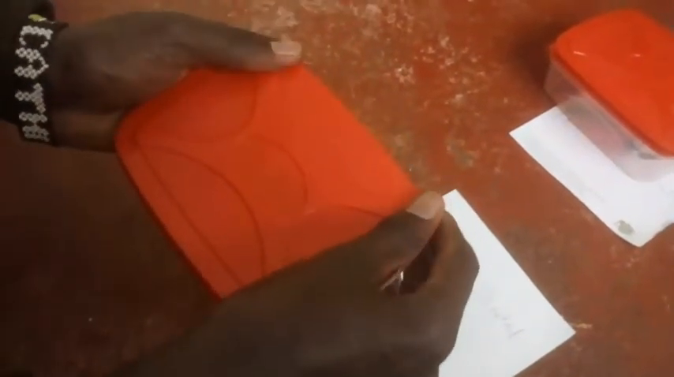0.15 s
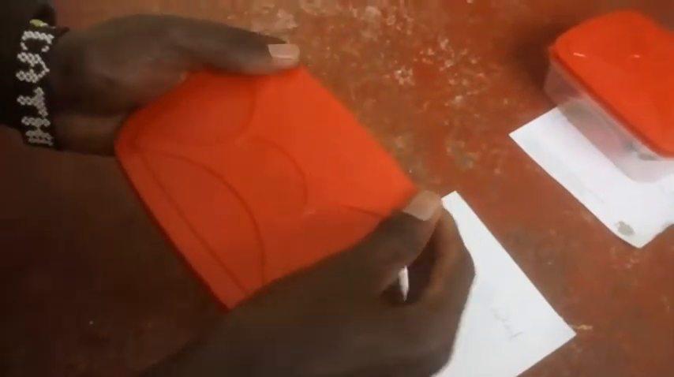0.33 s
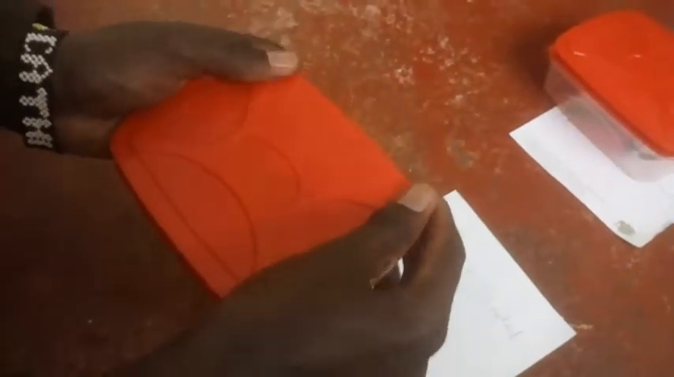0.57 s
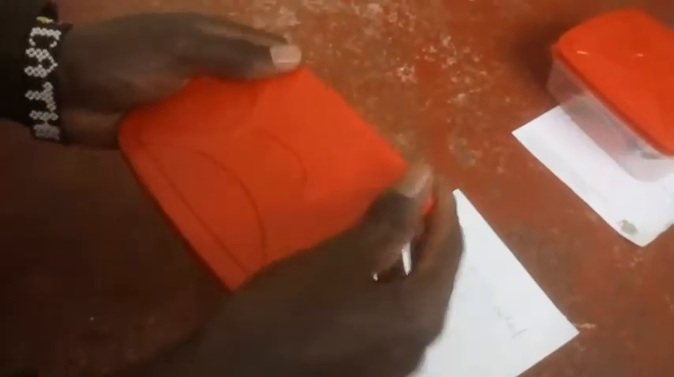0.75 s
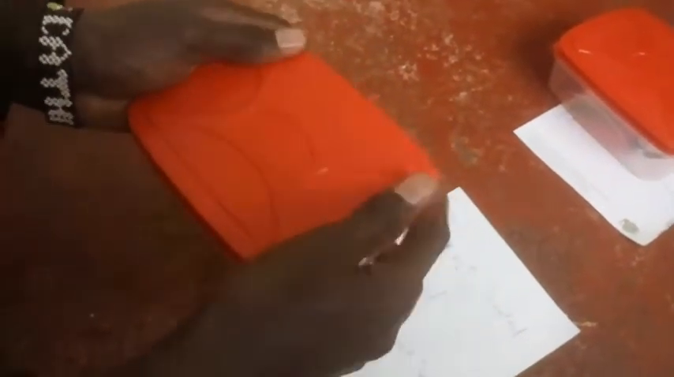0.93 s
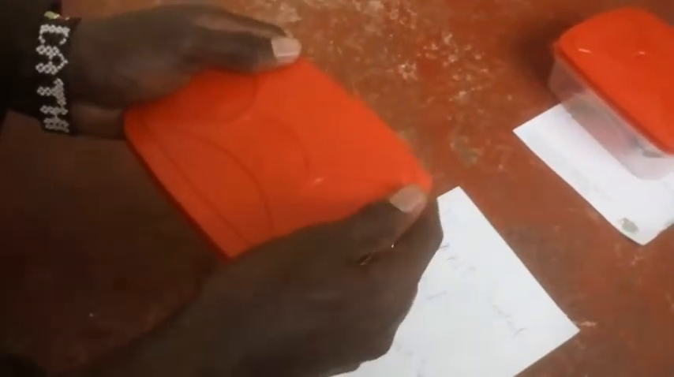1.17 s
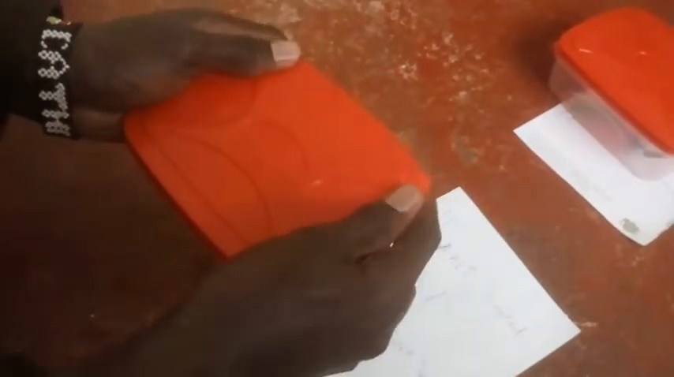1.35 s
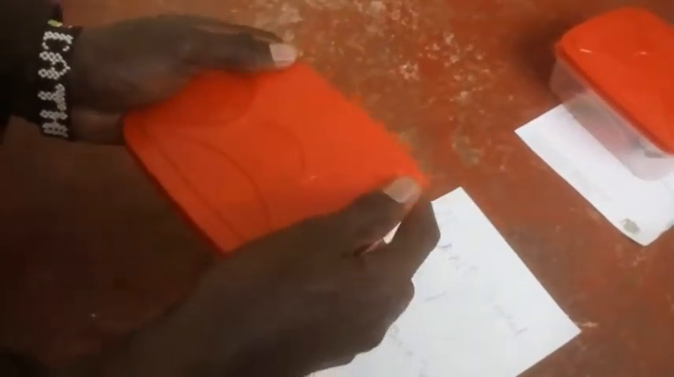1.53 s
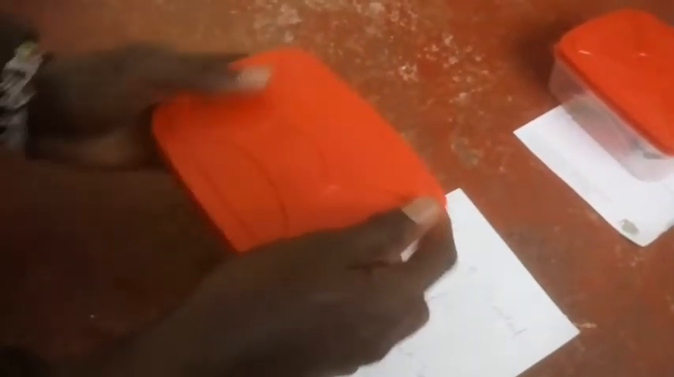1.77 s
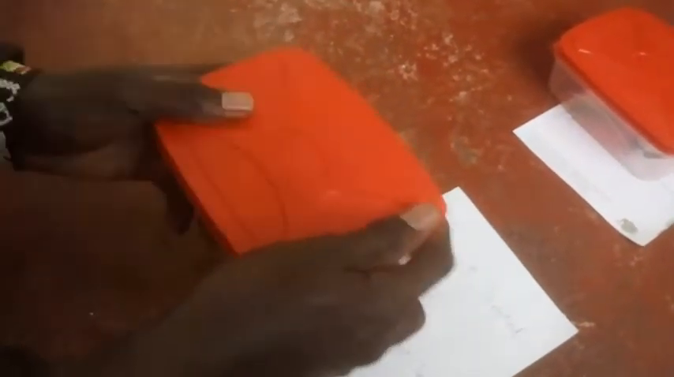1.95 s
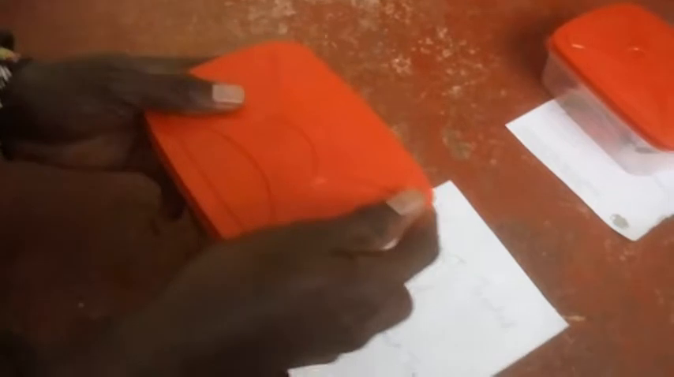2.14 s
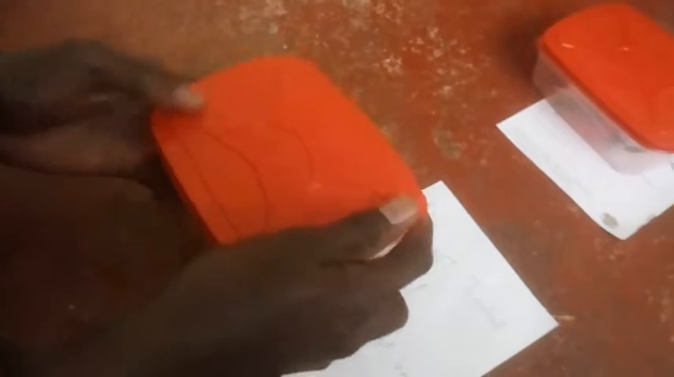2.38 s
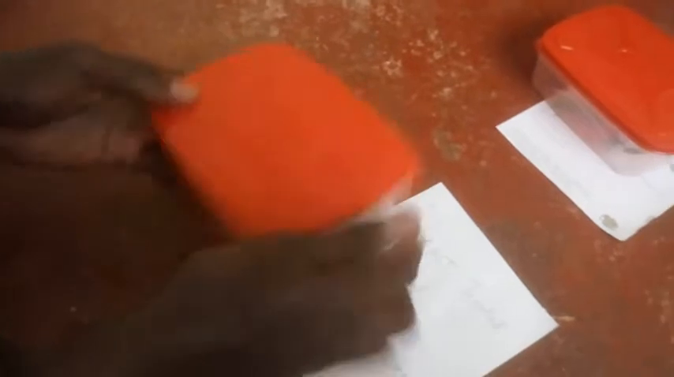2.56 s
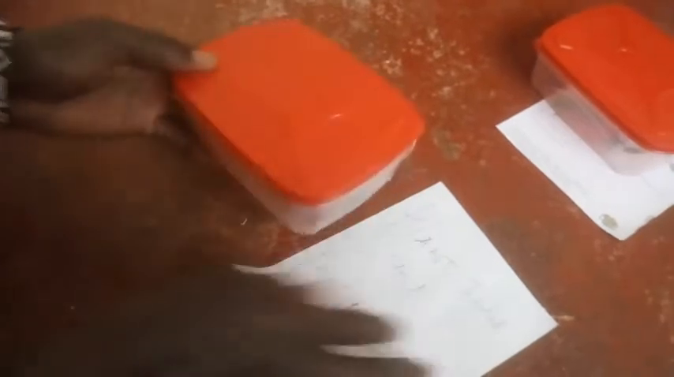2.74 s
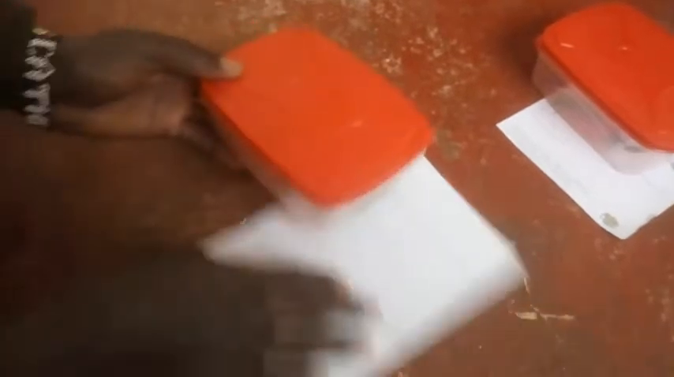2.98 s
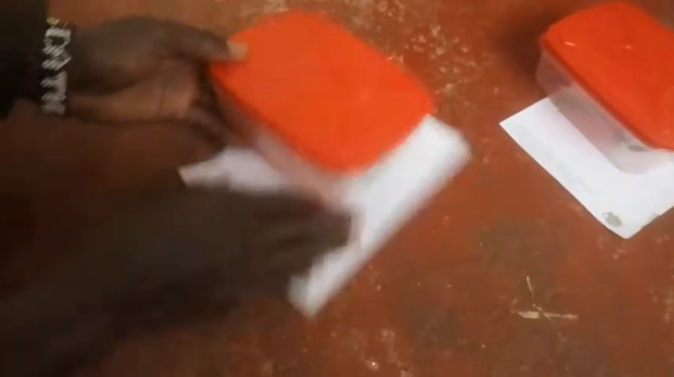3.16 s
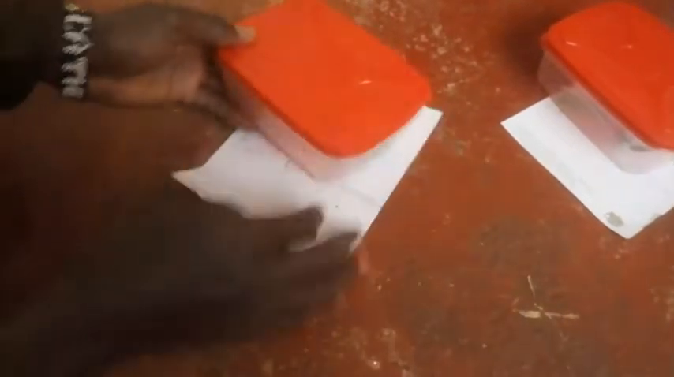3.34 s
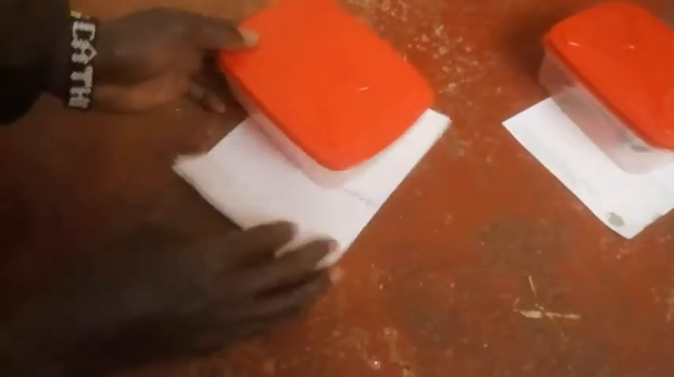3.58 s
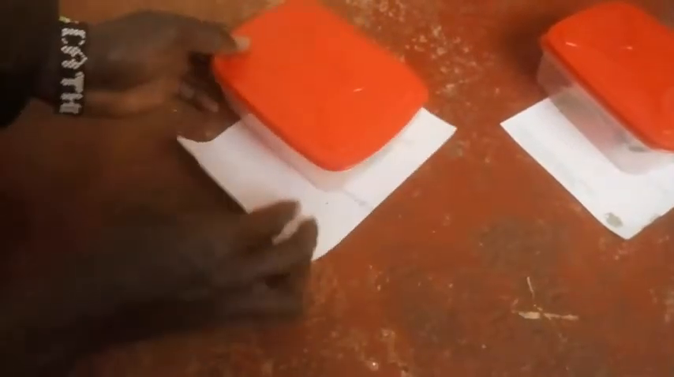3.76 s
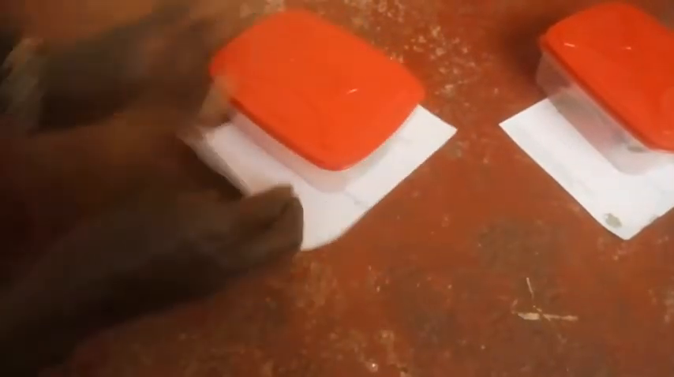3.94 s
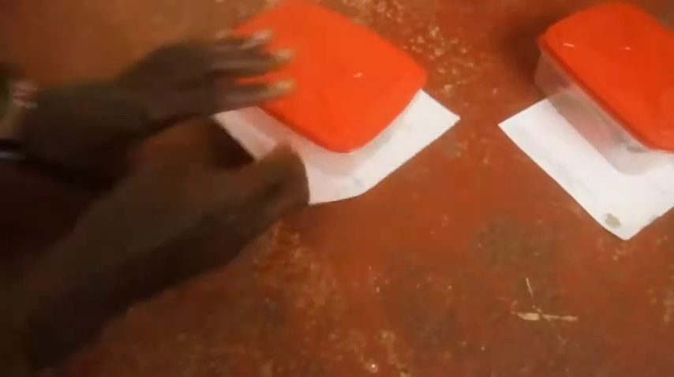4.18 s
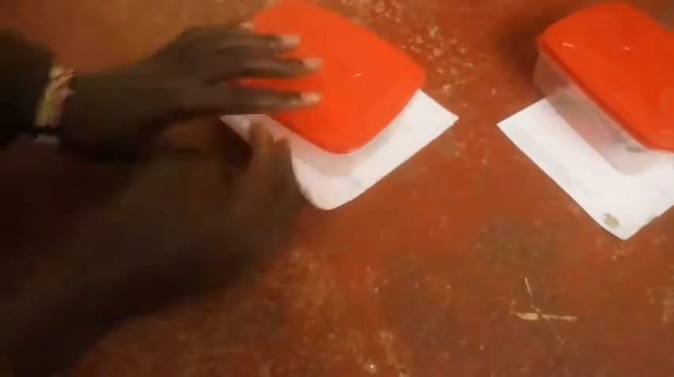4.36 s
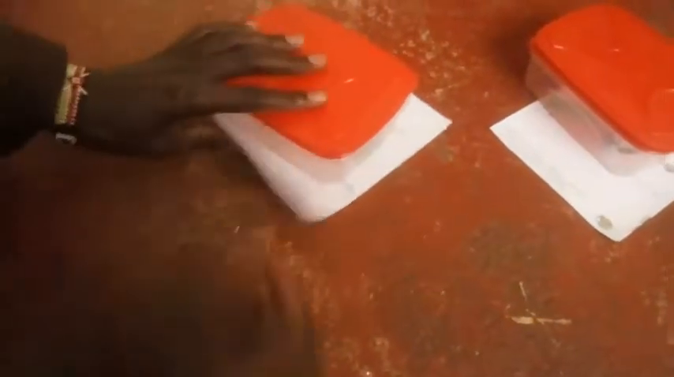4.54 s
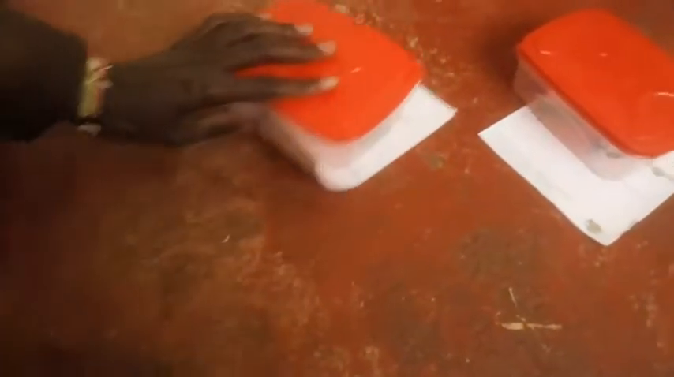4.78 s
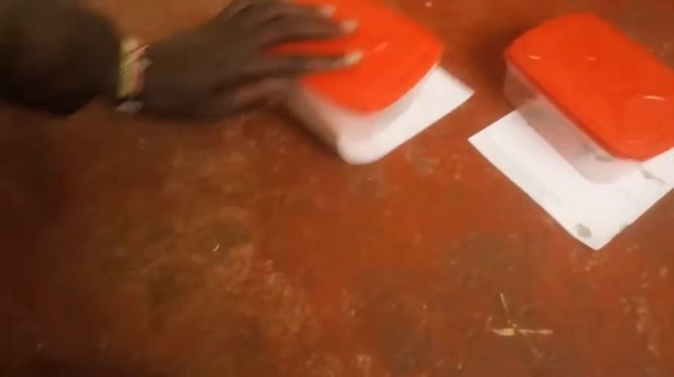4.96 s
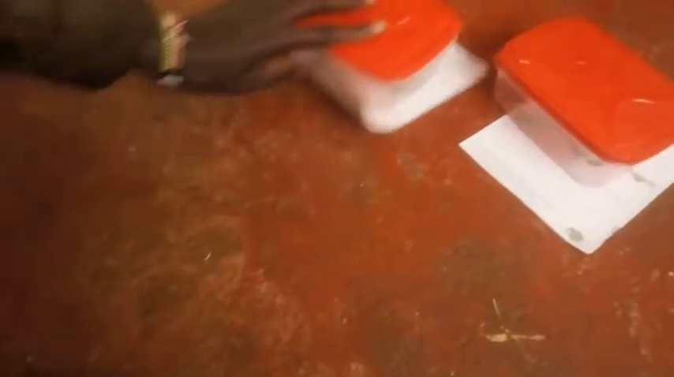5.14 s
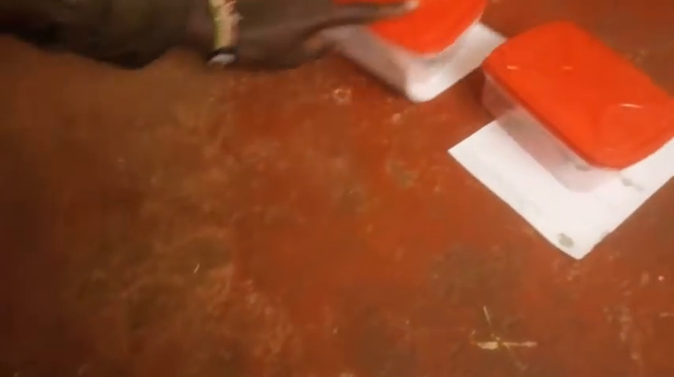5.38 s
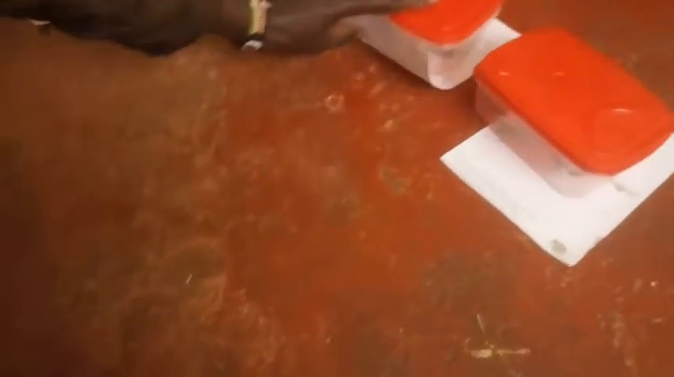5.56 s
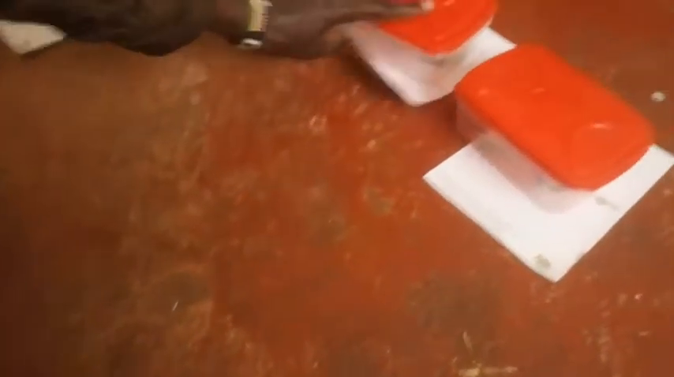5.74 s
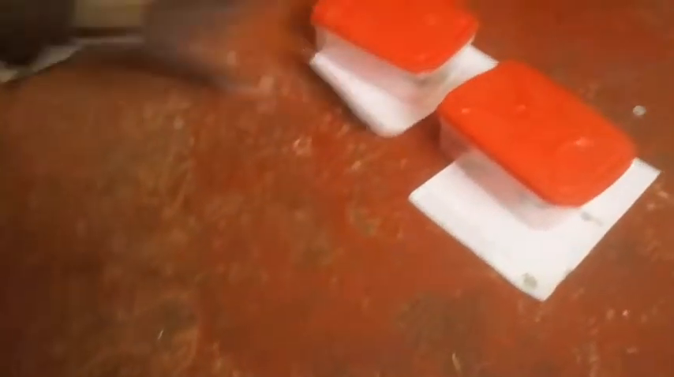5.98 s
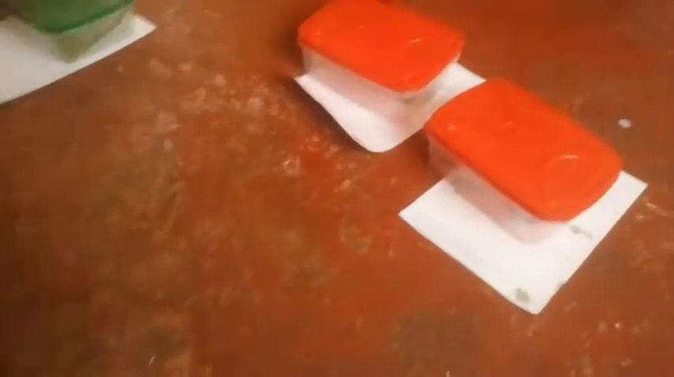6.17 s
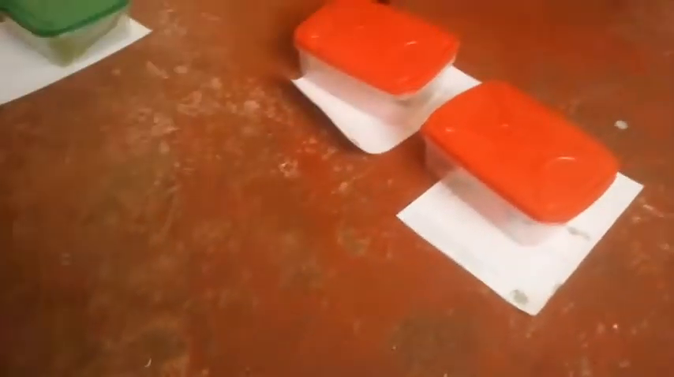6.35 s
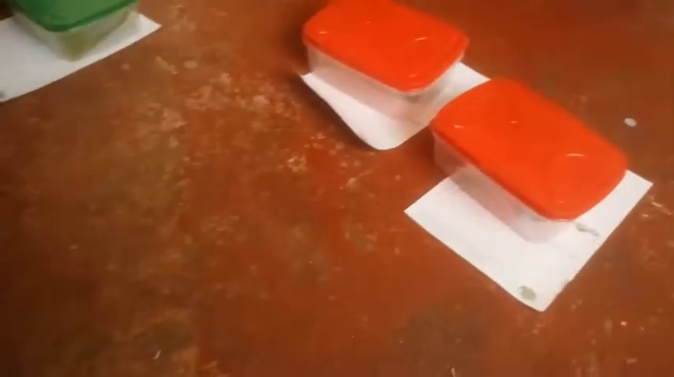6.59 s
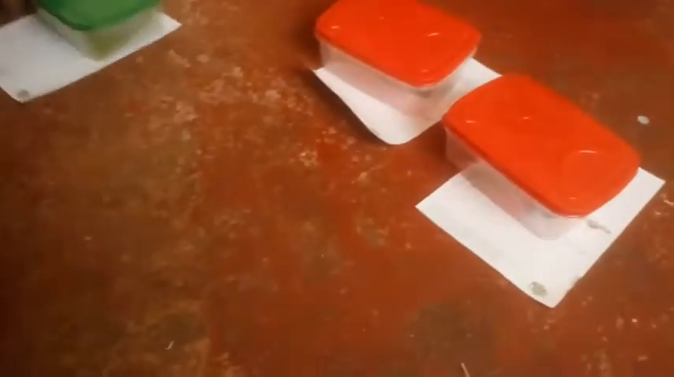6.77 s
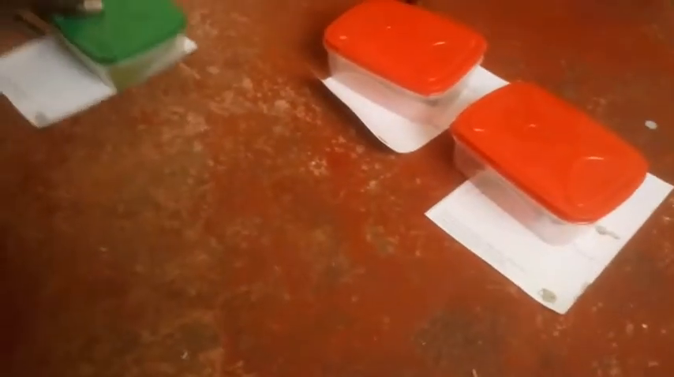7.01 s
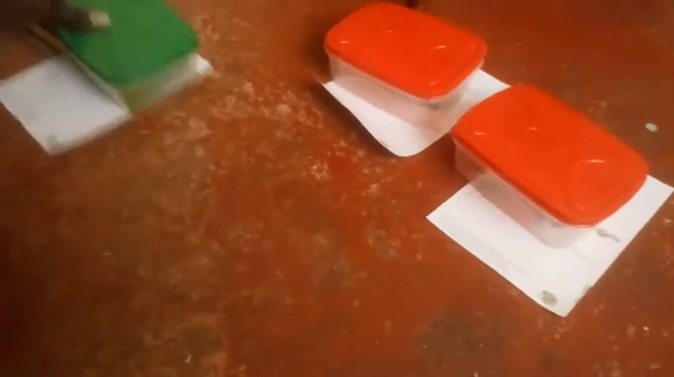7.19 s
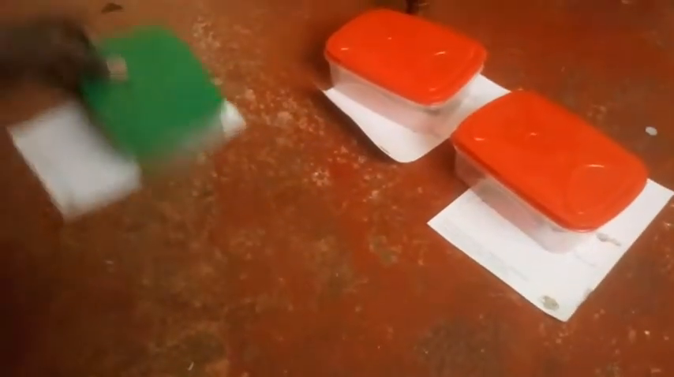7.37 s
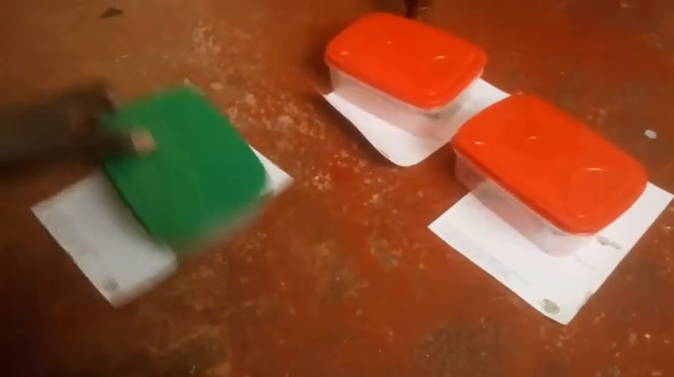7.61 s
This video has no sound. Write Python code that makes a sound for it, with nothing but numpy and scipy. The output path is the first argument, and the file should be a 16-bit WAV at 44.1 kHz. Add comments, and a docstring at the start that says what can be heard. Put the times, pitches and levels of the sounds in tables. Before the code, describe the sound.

Hands snap a lid onto a plastic food box with two loud cracks, then paper swishes and the box scrapes over gritty concrete in a bare room.

```python
"""Close on a hard floor, hands tap a plastic food box, then snap its lid on at 0.6 s and 1.2 s: bursts ring its modes.
Light rubs lead to a push of hissing paper at 2.9 s, after a faint whistle at 2.6 s. Set down at 3.4 s, the box
slides with the paper over gritty concrete from 4.7 s: streams of tiny catches hiss, crunch and shake its walls.
From 6.7 s a second box is dragged, growing louder. A bare room answers with noise echoes over a steady hush;
a phone listens from above through a left and a right port."""
import sys
import numpy as np
from scipy import signal
from scipy.fft import rfft, irfft, next_fast_len
from scipy.io import wavfile
from scipy.ndimage import uniform_filter1d

SR = 44100
rng = np.random.default_rng(int(sys.argv[2]) if len(sys.argv) > 2 else 0)


def materialize(psi):
    """Save the field psi as 16-bit PCM at rate SR to the path in sys.argv[1].

    A 1-D psi becomes a single channel; in a 2-D psi each row is a channel.
    """
    bounded = np.clip(np.atleast_2d(psi).T, -1, 1)
    quanta = np.round(bounded * 32767).astype(np.int16)
    wavfile.write(sys.argv[1], SR, quanta)


N = 336483  # length [samples]

# taps, snaps and paper cracks: (time [s], click peak before panning [dB], knock peak before panning [dB],
# click centre [Hz], knock centre [Hz], left minus right [dB])
BLOWS = [(0.044, -55, -53, 2070, 515, 1), (0.0624, -57, -53.5, 1910, 534, -8),
         (0.084, -37.5, -34, 1600, 550, 2), (0.086, -46.5, -63, 3740, 546, 35),
         (0.2558, -60, -50.5, 1450, 520, 27.5), (0.538, -54.5, -61, 6200, 244, 0),
         (0.6085, -12.5, -16.5, 3350, 830, 13), (0.6135, 1.5, -7.5, 3650, 590, -3.5),
         (0.6143, -35, -14.5, 3530, 210, 7), (0.616, -14, -38, 3500, 563, 26),
         (0.8946, -30.5, -42.5, 3360, 630, -3), (1.0172, -47.5, -42.5, 1590, 248, -3),
         (1.1078, -41.5, -38, 1790, 528, -3), (1.129, -48, -70, 3480, 511, -3),
         (1.2302, -15.5, -9.5, 3230, 450, 10), (1.2338, -28, -5, 3470, 370, 3.5),
         (1.2372, 1.5, -1.5, 3070, 454, 7), (1.6743, -36, -38.5, 5920, 229, 6),
         (1.7357, -38, -44.5, 3520, 458, 1), (1.8254, -39, -69.5, 3870, 383, -4),
         (2.269, -61.5, -66, 3684, 257.7, -0.5), (2.4967, -51.5, -82.5, 3843, 556, -2),
         (2.5458, -54, -77, 3500, 621, -5), (2.5601, -55.5, -68, 4660, 530, -9),
         (2.911, -42, -83.5, 4480, 503, 9), (3.402, -41, -31, 2500, 231.7, 2.5),
         (3.405, -62.5, -34, 3460, 670, -0.5), (3.4653, -40, -45, 5300, 396, -1.5),
         (3.562, -45.5, -48.5, 5600, 208.4, 7), (3.862, -72, -49.5, 3970, 197, 5),
         (3.911, -66, -45, 4000, 197, 2), (4.612, -60, -50.5, 4000, 173, 11),
         (3.7632, -34.5, -76, 4200, 224, -3), (3.9601, -26.5, -18, 3400, 506, 2),
         (4.056, -22, -34.5, 4050, 213, -2), (4.152, -30.5, -52, 5440, 400, -4),
         (4.177, -28.5, -68.5, 5210, 407, -3), (4.2865, -31.5, -45.5, 5030, 230, -3),
         (4.372, -25.5, -53.5, 3930, 225, -1.5), (4.426, -35, -52.5, 5050, 613, 1),
         (4.4875, -40, -79, 5670, 246, 9), (4.566, -36.5, -60, 4040, 252, -4),
         (6.0198, -37.5, -67, 5100, 246.6, 16), (6.023, -27, -73, 2900, 247, 1.5),
         (6.106, -57, -51, 1202, 450.4, -4.5), (6.683, -69.5, -47.5, 5140, 414, -9),
         (6.6966, -65, -33, 5080, 417, 2.5), (6.9202, -32, -32.5, 3540, 455, 0.5),
         (7.5888, -35, -20, 1880, 470, 1), (7.607, -43, -21, 1850, 504, 4)]
# stiff rim of the lid: (mode [Hz], relative level [dB], t60 [s])
RIM_MODES = [(1380, -1, 0.039), (1740, -1.5, 0.019), (2170, -3, 0.032), (2650, 1.5, 0.0076),
             (2900, -4.5, 0.0096), (3260, 0.5, 0.0057), (3588, 1.5, 0.016), (3850, -3.5, 0.021),
             (4632, 0, 0.0036), (5040, -13, 0.025), (5740, 5.5, 0.0026), (5600, -3, 0.024),
             (7560, -17, .004), (8850, -21, 0.0033), (12000, -16.5, .003)]
# walls, lid and air of the box in the hands, the box on the floor, the second box:
# one list each of (mode [Hz], relative level [dB])
BOX_MODES = [
    [(178, -4), (232, -4.5), (282, -6), (332, -9), (400, -9.5), (480, 1), (530, 0.5), (595, -3.5),
     (850, -14.5), (1045, -7), (1320, -16)],
    [(135, -8.5), (178, -2.5), (212, -1.5), (290, -12), (385, -10.5), (490, -11.5), (550, 2), (600, 2),
     (700, -6.5), (800, -14), (1115, -14), (1340, -36)],
    [(190, -25.5), (240, -4), (325, -4), (425, -1.5), (480, 1.5), (530, -1.5), (655, -13), (820, -11.5),
     (1060, -17), (1320, -6.5)],
]
# when each of these boxes takes over: (time [s])
BOX_FROM_S = [0, 3.38, 6.5]
# where each box favours its modes when rubbed: (drumming [Hz], hollow [Hz])
RUBBED_CENTRES = [(185, 680), (205, 670), (245, 775)]
# short rubs and shuffles: (start [s], speeding up [s], steady [s], slowing [s], left minus right [dB],
# then levels at full speed: paper hiss [dB], grit [dB], drumming [dB], hollow [dB])
RUBS = [(.09, 0.012, 0.06, 0.25, 7, -94, -71.5, -64.5, -55.5),
        (1.839, 0.046, 0.055, 0.18, 1.5, -61, -60.5, -74.5, -74.5),
        (2.289, 0.046, 0.0073, 0.11, -3, -58, -57, -74, -66),
        (2.488, 0.089, 0.042, .1, 1, -75, -74, -78.5, -64),
        (3.48, 0.043, 0.057, 0.09, 6.5, -55, -89.5, -56, -80.5),
        (3.58, 0.037, 0.09, 0.088, 1.5, -56.5, -83, -77, -83),
        (3.67, 0.058, 0.021, 0.15, 3, -51, -70, -72, -85),
        (3.839, 0.097, 0.097, .04, 5, -60, -62.5, -53, -71),
        (3.988, 0.043, 0.27, 0.068, 2, -43.5, -52, -69, -58),
        (4.45, 0.028, 0.0094, 0.19, 3, -48, -61.5, -64, -70),
        (4.539, 0.027, 0.33, 0.06, 4.5, -52.5, -81, -73, -77),
        (6.119, 0.023, 0.039, 0.076, -1.5, -78, -66.5, -89, -85),
        (6.76, 0.075, 0.043, 0.23, 2.5, -42, -44.5, -52.5, -41)]
# long pushes: (left minus right [dB], the four levels at full effort [dB], list of (time [s], effort [dB]))
PUSHES = [(1.3, (-28.5, -58.5, -87, -73.5), [(2.895, -49.5), (2.912, -20), (2.956, -9.5), (3.08, -9.5),
          (3.17, -6), (3.25, -3), (3.29, -8.5), (3.335, -16), (3.42, -45.5)]),
          (1.2, (-35, -37.5, -48, -47.5), [(4.66, -48), (4.72, -8), (4.8, -4.5), (5.02, -2), (5.3, -1.5),
          (5.55, -1.5), (5.62, -2), (5.8, -6.5), (6.0, -22), (6.1, -51)]), (0.9, (-40, -34, -39, -35),
          [(6.68, -57), (6.72, -21), (7.0, -16), (7.21, -16.5), (7.27, -4.5), (7.3, -5.5), (7.43, 0.5),
          (7.47, -3), (7.56, 0.5), (7.63, -0.5)])]
# gain per dB of effort, one each for paper, grit, drumming, hollow: (slope [dB/dB])
EFFORT_SLOPES = [1.213, 1.47, 0.85, 1.22]
# spectrum of paper fibres catching: (frequency [Hz], relative level [dB])
PAPER_SPECTRUM = [(410, -69), (700, -40), (1020, -24), (1210, -27), (2920, -19.5), (3840, -8), (4990, -7),
                  (5600, -4.5), (6400, -8), (7890, -24), (14600, -36.5), (16000, -46)]
# spectrum of grit crunching: (frequency [Hz], relative level [dB])
GRIT_SPECTRUM = [(500, -0.5), (800, -2), (1200, -4), (2000, -5), (3500, 0.5), (4500, -7.5), (7000, -79)]
# soft bumps of a hand on floor or phone, and at 6.109 s the broad pulse of a knock on the box: (time [s], level
# [dB], pitch [Hz], t60 [s])
BUMPS = [(2.244, -38, 134.6, 0.044), (2.267, -45.5, 84, 0.074), (4.527, -36, 70, 0.074),
         (6.1086, -20, 630, 0.0034), (6.123, -44, 87.4, 0.092), (6.2, -52, 151.3, 0.036),
         (6.246, -47, 138, 0.058)]
# room in octaves: (centre [Hz], t60 [s], level before the echo colour [dB], likeness of left and right [0-1])
ROOM_OCTAVES = [(90.5, 1, 6, 0.8), (196, 0.83, 3.5, 0.91), (367, 0.76, 2, 0.7), (660, 0.61, 0, 0.1),
                (1396.5, 0.87, -6.5, 0.14), (3000, 0.71, -2.5, 0.1), (5185, 0.63, -4, 0.1),
                (11700, .33, -22, 0)]
# colour of the echoes as the phone's microphone hears them, dull above 7 kHz: (frequency [Hz], gain [dB])
ECHO_COLOUR = [(130, 5), (220, 1.5), (620, -2.5), (800, 0), (1800, 2.5), (3500, -0.5), (4300, -1.5),
               (6500, 1), (7500, -8.5), (16000, -18)]
# colour of the background hush: (frequency [Hz], relative level [dB])
HUSH_COLOUR = [(15, -63), (25, -3.5), (180, -12.5), (301, -18.5), (1040, -21.5), (1650, -25), (1790, -23.5),
               (3080, -28), (5280, -23.5), (7510, -34), (14000, -46), (16000, -35.5)]

KNOCK_FOCUS_DB, CLICK_FOCUS_DB, RUB_FOCUS_DB = 4, 4, 13  # fall of modes per squared octave from the centre
RING_CYCLES = 25  # swings in which a wall fades by 60 dB, unless the limit below cuts it short
LONGEST_RING_S = .034  # hands and floor damp the deep walls to this t60
PUSH_CYCLES = 0.36  # contact lasts this share of the knock's period
THUD_DB, CRACK_DB = -19, -7  # broad thud beside the box modes, broad crack beside the rim modes
CLICK_T60_S = .017  # spray of slips in a light click
SNAP_SHORTENS = 0.45  # share by which the spray of a 0 dB click fades faster
SPEED_POWER = 3.4  # amplitude of a rub follows this power of its speed
JUDDER_DB = 1.8  # level spread as a slide catches and lets go
FLEX, GRIP_DB = .045, 5  # a pushed box flexes: pitch spread (share), level spread of each grip
BOX_FLOOR_HZ = 106  # so small a box sends out no deep bass
WHISTLE_START_S, WHISTLE_END_S = 2.6, 2.79
WHISTLE_HZ, WHISTLE_DB = 1150, -69  # centre pitch and level, both wavering
ECHO_CHANGE_S = .5  # the echo pattern is redrawn and crossfaded at this interval
HUSH_DB = -69.5  # rms
RIGHT_LAG = 9  # the right port hears later [samples]
TOP_HZ = 15550  # upper limit of the phone


def blows():
    """Contact excites box and rim modes; rows are left port, right port and what the walls receive."""
    out = np.zeros((3, N))
    for s, click_db, knock_db, click_hz, knock_hz, pan_db in BLOWS:
        box = box_modes(np.searchsorted(BOX_FROM_S, s) - 1)
        split = len(box)
        counts = [split, len(RIM_MODES)]
        mode_hz = np.array(box + RIM_MODES)[:, 0]
        chance = rng.standard_normal((2, len(mode_hz)))
        scatter_db, drift = 2 * chance[0], 1 + .015 * chance[1]  # each blow lands elsewhere
        # modes far from the struck spot's own pitch stay quiet
        octaves = np.log2(mode_hz / np.repeat([knock_hz, click_hz], counts))
        share_db = scatter_db - np.repeat([KNOCK_FOCUS_DB, CLICK_FOCUS_DB], counts) * octaves ** 2
        knock = hollow_knock(box, share_db[:split], drift[:split], knock_hz)
        click = sharp_click(share_db[split:], drift[split:], click_hz, click_db)
        left, right = undb([pan_db / 2, -pan_db / 2])
        add(out, s, undb(knock_db) * knock / np.abs(knock).max(), [left, right, 1])
        add(out, s, click, [left, right, 0])
        # the walls hear the rim from all sides at once, which evens out the colour
        to_walls = band(impulse(SR // 8), click_hz / 3, click_hz * 1.9)
        same_energy = np.sqrt(np.sum(click ** 2) / np.sum(to_walls ** 2))
        add(out, s, to_walls * same_energy, [0, 0, 1])
    return out


def hollow_knock(box, share_db, drift, knock_hz):
    """Soft plastic gives way for a moment, so a smooth push drives the walls and a broad thud."""
    walls = ring(box, share_db, drift)
    thud = impulse(len(walls)) * undb(THUD_DB) * np.sqrt(np.sum(walls ** 2) * SR / knock_hz)
    push = np.hanning(int(PUSH_CYCLES * SR / knock_hz))
    knock = signal.fftconvolve(walls + thud, push)
    knock = band(knock, knock_hz / 2.4, knock_hz * 2.3)
    return band(knock, knock_hz / 2.4, knock_hz * 3)


def sharp_click(share_db, drift, click_hz, click_db):
    """A fading spray of tiny slips excites the stiff rim; harder snaps are shorter and brighter."""
    rim = ring(RIM_MODES, share_db, drift)
    rim = rim + impulse(len(rim)) * undb(CRACK_DB) * np.sqrt(np.sum(rim ** 2))
    # only a hard snap reaches the highest treble
    top_hz = np.clip(click_hz * (1.7 + 6 * undb(click_db)), 0, 11000)
    rim = band(band(rim, click_hz / 3, top_hz), click_hz / 6, top_hz)
    t = np.arange(SR // 20) / SR
    fade = 1000. ** (-t / CLICK_T60_S * (1 + SNAP_SHORTENS * undb(click_db)))
    click = signal.fftconvolve(rim, rng.standard_normal(len(t)) * fade)
    return click * undb(click_db) / np.abs(click).max()


def box_modes(which):
    """Modes (Hz, dB, t60 s): equal loss per swing, with the ring of the deeper ones held to a limit."""
    return [(hz, db, min(RING_CYCLES / hz, LONGEST_RING_S)) for hz, db in BOX_MODES[which]]


def ring(modes, extra_db, drift):
    """Modes answer an impulse as fading sines; successive ones swing in opposite senses."""
    hz, db, t60 = np.transpose(modes)[:, :, None]
    t = np.arange(SR // 8) / SR
    sense = (-1.) ** np.arange(len(modes))[:, None]
    level = sense * undb(db + extra_db[:, None])
    swing = np.sin(2 * np.pi * hz * drift[:, None] * t)
    return np.sum(level * swing * 1000. ** (-t / t60), axis=0)


def slides():
    """Paper hisses over the floor, grit crunches under the load and shakes the box; third row to the walls."""
    hiss, crunch, drumming, hollow = pressure()
    # the sheet is wide, so each port hears other fibres
    paper = np.array([colour(grains(7000, 2.2), PAPER_SPECTRUM) * undb(1.6 * walk(40)) for _ in range(2)])
    grit = np.array([colour(grains(8000, 1.8), GRIT_SPECTRUM) * undb(0.81 * walk(30)) for _ in range(2)])
    which = np.searchsorted(BOX_FROM_S, np.arange(N) / SR, "right") - 1
    hums = [[shaken(k, hz) for hz in centres] for k, centres in enumerate(RUBBED_CENTRES)]
    low, high = np.choose(which, hums)
    ports = hiss * unit(paper) + crunch * unit(grit) + drumming * low + hollow * high
    ports = ports * undb(JUDDER_DB * unit(walk(18) + walk(70)))
    return np.vstack([ports, ports.mean(axis=0)])


def pressure():
    """Gains of paper, grit, drumming and hollow at both ports: speed and effort set them, powers add."""
    t, power = np.arange(N) / SR, np.zeros((4, 2, N))
    for start, rise, steady, fall, pan_db, *db in RUBS:
        speed = np.interp(t, np.cumsum([start, rise, steady, fall]), [0, 1, 1, 0])
        power += port_gains(db, pan_db) ** 2 * speed ** (2 * SPEED_POWER)
    for pan_db, db, effort in PUSHES:
        effort_db = np.interp(t, *np.transpose(effort), left=-200, right=-200)
        effort_gain = undb(np.outer(EFFORT_SLOPES, effort_db))[:, None]
        power += (port_gains(db, pan_db) * effort_gain) ** 2
    return np.sqrt(power)


def port_gains(db, pan_db):
    """Half the level difference raises the left port, half lowers the right."""
    return undb(np.add.outer(db, [pan_db / 2, -pan_db / 2]))[:, :, None]


def shaken(which, centre_hz):
    """Dense jolts keep modes near a pitch sounding; three grips, flexed apart in pitch, wax and wane."""
    mode_hz = np.array(BOX_MODES[which])[:, 0]
    share_db = -RUB_FOCUS_DB * np.log2(mode_hz / centre_hz) ** 2
    hum = 0
    for flex in 1 - FLEX, 1, 1 + FLEX:
        jolts = grains(500, 2.5) * undb(3.5 * walk(25) + GRIP_DB * walk(6))
        response = ring(box_modes(which), share_db, np.full(len(share_db), flex))
        hum = hum + signal.fftconvolve(jolts, response)[:N]
    return unit(hum)


def grains(per_s, spread_db):
    """Tiny catches of a rough surface: random clicks whose uneven boost is capped."""
    size = undb(spread_db * np.minimum(rng.exponential(size=N), 3))
    return (rng.random(N) < per_s / SR) * rng.standard_normal(N) * size


def bumps():
    """Dull thumps, quick-rising fading sines, heard at the ports without echoes."""
    out, t = np.zeros((2, N)), np.arange(SR // 4) / SR
    for s, db, hz, t60 in BUMPS:
        swell = np.clip(t * hz * 2, 0, 1) * 1000. ** (-t / t60)
        add(out, s, undb(db) * swell * np.sin(2 * np.pi * hz * t), [1, .8])
    return out


def whistle():
    """A thin sine with wavering phase and level swells and fades."""
    t = np.arange(N) / SR
    progress = np.clip((t - WHISTLE_START_S) / (WHISTLE_END_S - WHISTLE_START_S), 0, 1)
    level = undb(WHISTLE_DB + 3 * walk(60)) * np.sin(np.pi * progress) ** 2
    return level * np.sin(2 * np.pi * WHISTLE_HZ * t + .6 * walk(40))


def room(x):
    """Echoes whose fine pattern changes steadily, crossfaded."""
    out, hop = np.zeros((2, N)), int(ECHO_CHANGE_S * SR)
    padded, fade = np.pad(x, (hop, 2 * hop)), np.sqrt(np.hanning(2 * hop))
    for i in range(0, N + hop, hop):
        wet = signal.fftconvolve((padded[i:i + 2 * hop] * fade)[None], echoes(), axes=1)
        add(out, max(i - hop, 0) / SR, wet[:, max(hop - i, 0):], [1, 1])
    return out


def echoes(first_s=0.0056, build_s=0.0016):
    """Dense echoes build up after the first wall, each octave dying at its own pace."""
    t, tail = np.arange(int(1.2 * SR)) / SR, 0
    for hz, t60, db, alike in ROOM_OCTAVES:
        fade = 1000. ** (-t / t60) * np.clip((t - first_s) / build_s, 0, 1)
        share = np.sqrt(hz / SR / np.sum(fade ** 2))  # a wider octave holds more of the energy
        tail = tail + undb(db) * share * fade * pair(len(t), hz, alike)
    return colour(tail, ECHO_COLOUR)


def hush():
    """The quiet room and the phone's own hiss: octaves of wavering noise, the bass more alike on both ports."""
    octaves = [(36.5, 0.5)] + [(hz, alike) for hz, _, _, alike in ROOM_OCTAVES]
    white = sum(np.sqrt(hz) * undb(1.5 * walk(12)) * pair(N, hz, alike) for hz, alike in octaves)
    return undb(HUSH_DB) * unit(colour(white, HUSH_COLOUR))


def pair(size, hz, alike):
    """One octave of noise for both ports; shared and opposed parts set their likeness."""
    mid, side = (unit(band(rng.standard_normal(size), hz / np.sqrt(2), hz * np.sqrt(2))) for _ in range(2))
    alike = np.clip(alike, 0, 1)
    return np.sqrt((1 + alike) / 2) * mid + np.sqrt((1 - alike) / 2) * side * np.array([[1], [-1]])


def walk(rate):
    """Random levels held 1 / rate s and slewed; spread 1."""
    k = int(SR / rate)
    held = np.repeat(rng.standard_normal(N // k + 1), k)
    return unit(uniform_filter1d(held, k)[:N])


def undb(db):
    """Decibels to amplitude."""
    return 10 ** (np.asarray(db) / 20)


def unit(x):
    """Scale to rms 1."""
    return x / np.sqrt(np.mean(x ** 2))


def impulse(size):
    """A single-sample push at the start."""
    return 1. * (np.arange(size) == 0)


def colour(x, shape):
    """Weight a sound by (Hz, dB) points, joined along log frequency."""
    hz, db = np.transpose(shape)
    size = next_fast_len(x.shape[-1])
    bins = np.maximum(np.arange(size // 2 + 1) * SR / size, 1)
    gain = undb(np.interp(np.log(bins), np.log(hz), db))
    return irfft(rfft(x, size) * gain, size)[..., :x.shape[-1]]


def band(x, lo_hz, hi_hz):
    """Band-pass."""
    return signal.sosfilt(signal.butter(2, [lo_hz, hi_hz], "band", fs=SR, output="sos"), x)


def add(out, s, sound, gains):
    """Place a sound in time, with one gain for each row."""
    i = round(s * SR)
    sound = sound[..., :N - i]
    out[:, i:i + sound.shape[-1]] += sound * np.reshape(gains, (-1, 1))


def scene():
    """Near sounds reach the right port a little later; echoes and hush join them at the phone."""
    no_bass = signal.butter(3, BOX_FLOOR_HZ, "high", fs=SR, output="sos")
    near = signal.sosfilt(no_bass, blows() + slides())
    heard = near[:2] + bumps() + whistle()
    heard[1] = np.concatenate([np.zeros(RIGHT_LAG), heard[1, :-RIGHT_LAG]])
    return heard + room(near[2]) + hush()


def record(dry):
    """The phone clips peaks beyond full scale and cuts the top."""
    clipped = np.clip(dry, -1, 1)
    cut_top = signal.ellip(8, .2, 70, TOP_HZ, fs=SR, output="sos")
    return np.clip(signal.sosfilt(cut_top, clipped), -1, 1)


dry = scene()
out = record(dry)
materialize(out)
```